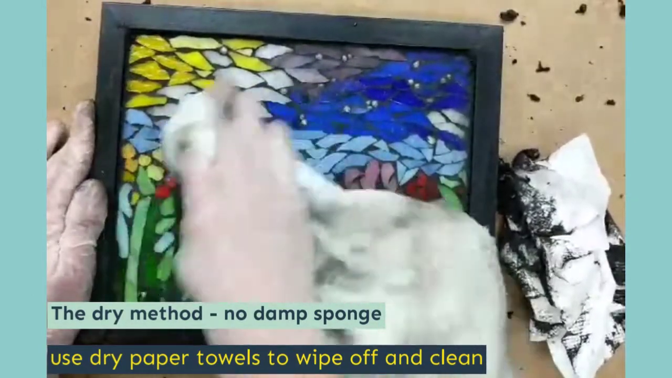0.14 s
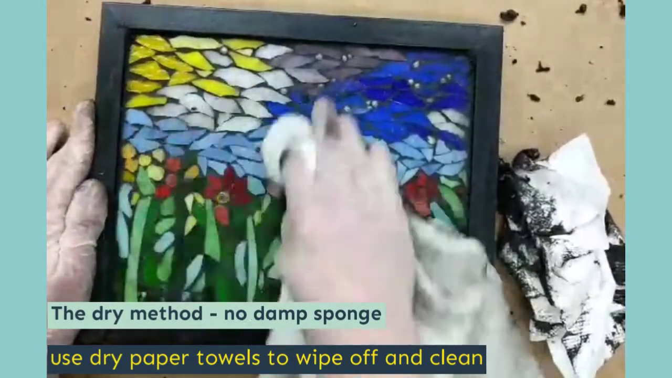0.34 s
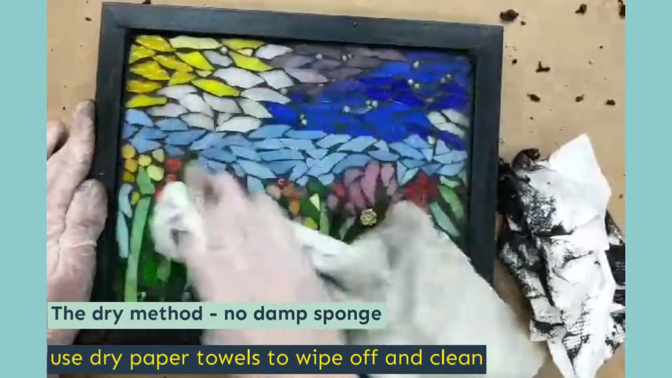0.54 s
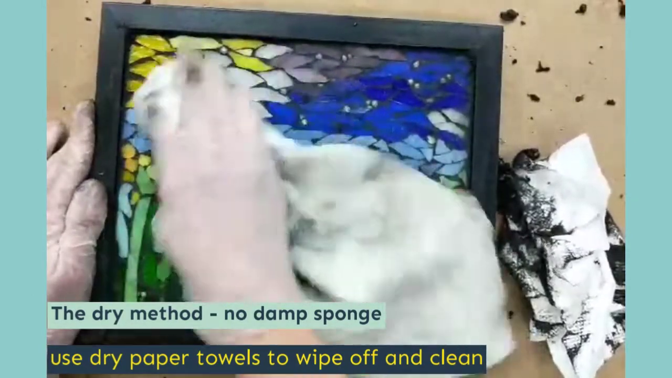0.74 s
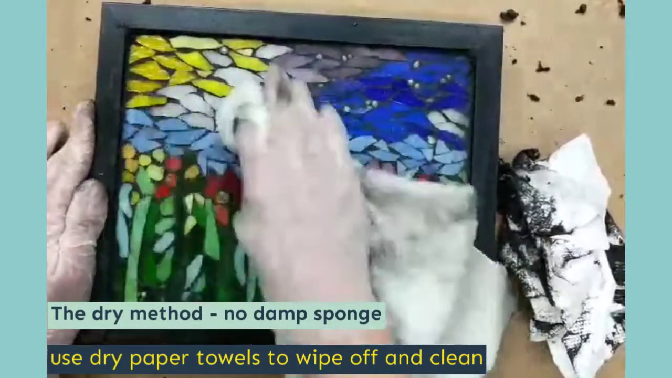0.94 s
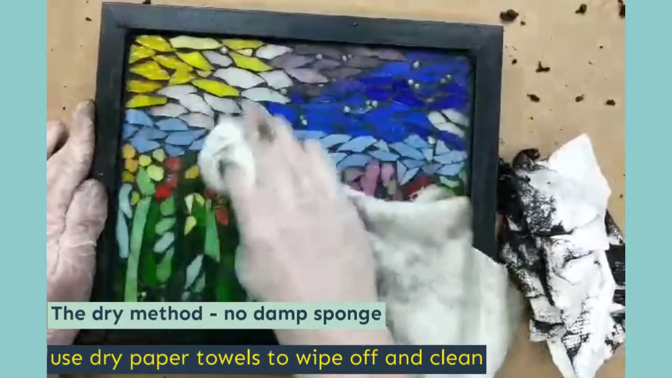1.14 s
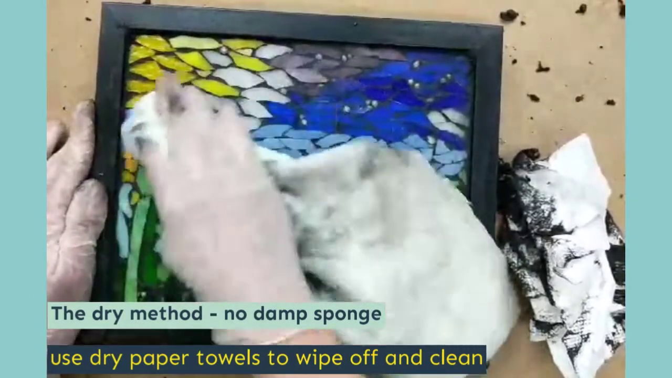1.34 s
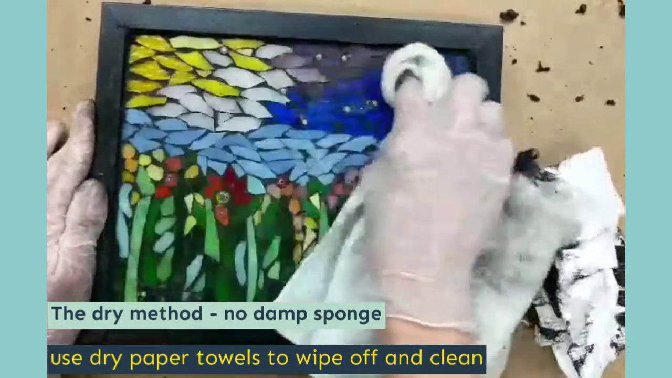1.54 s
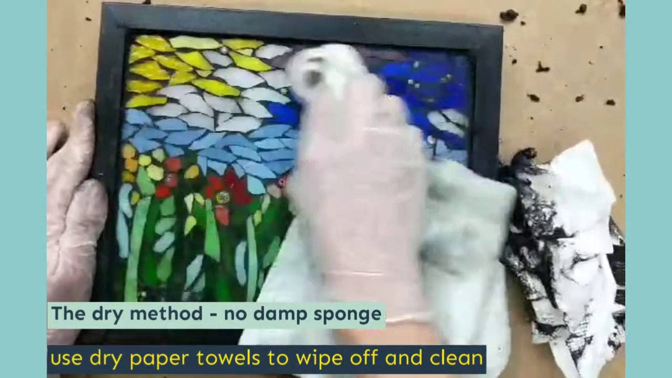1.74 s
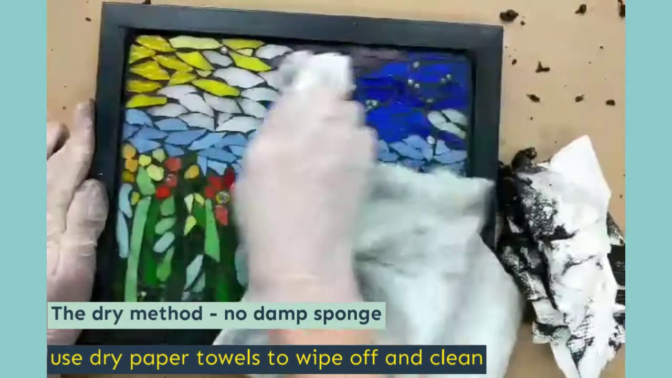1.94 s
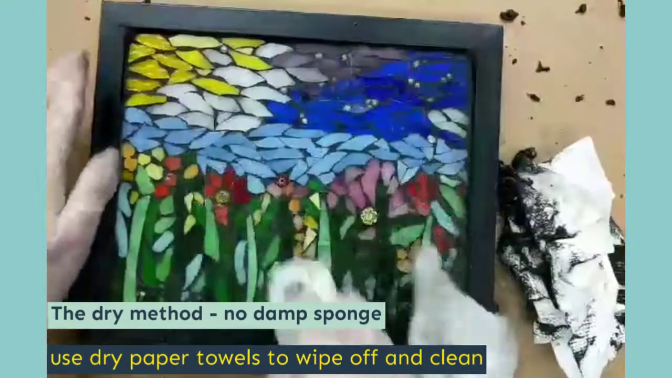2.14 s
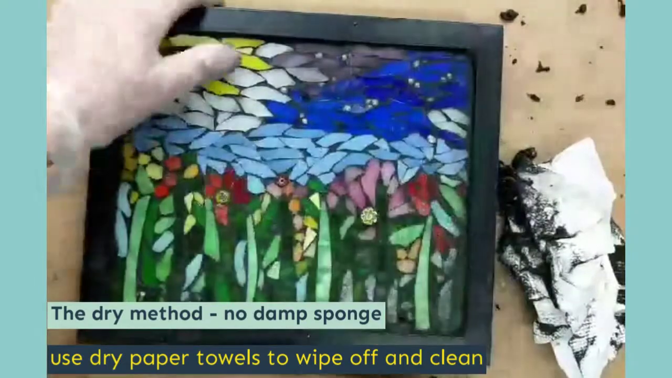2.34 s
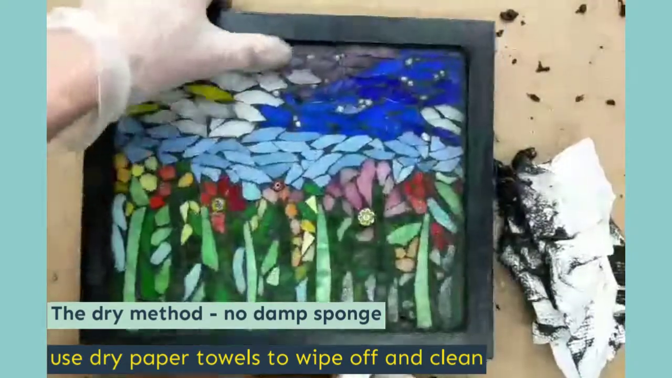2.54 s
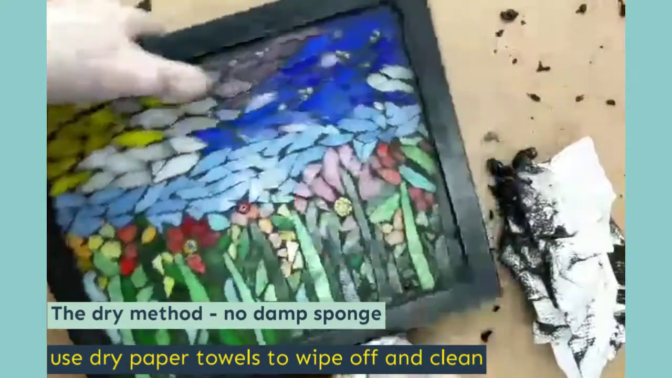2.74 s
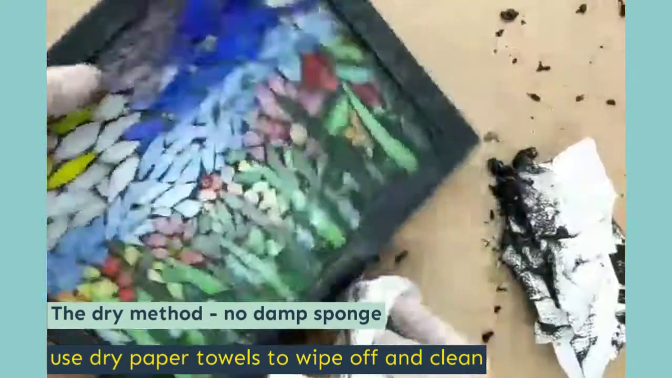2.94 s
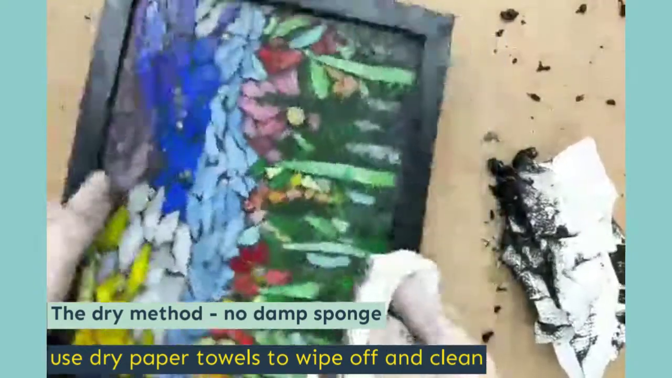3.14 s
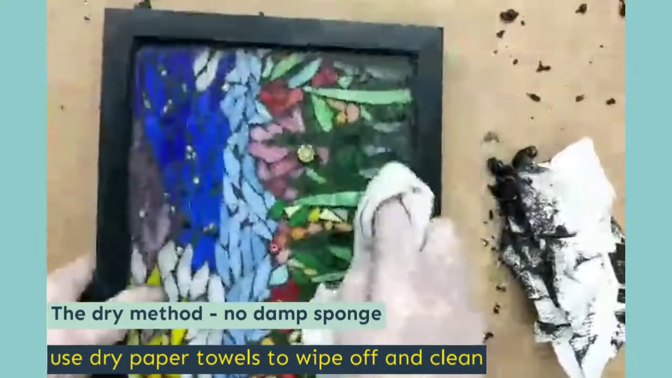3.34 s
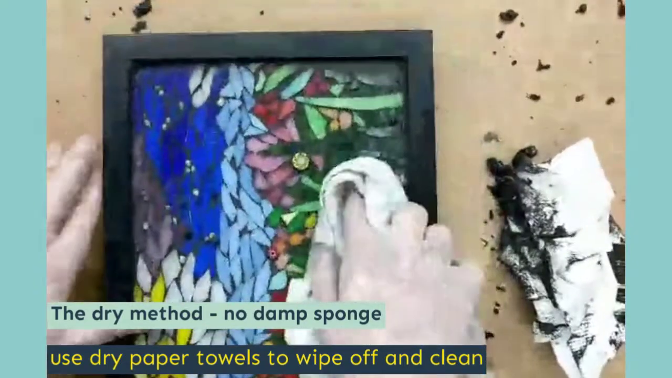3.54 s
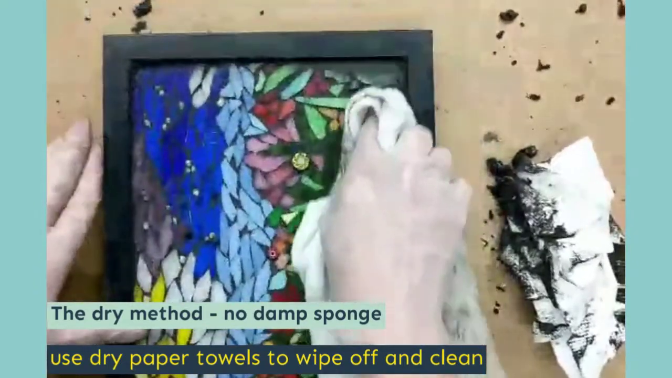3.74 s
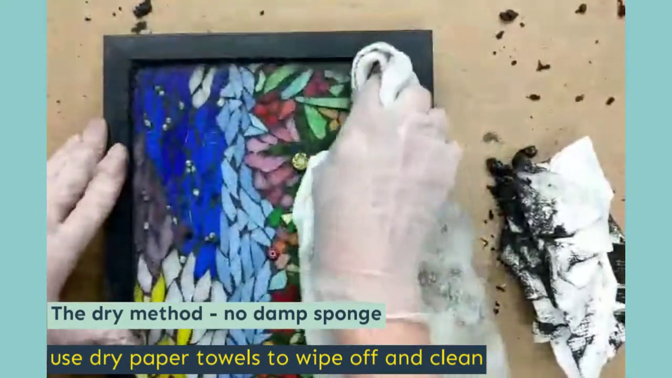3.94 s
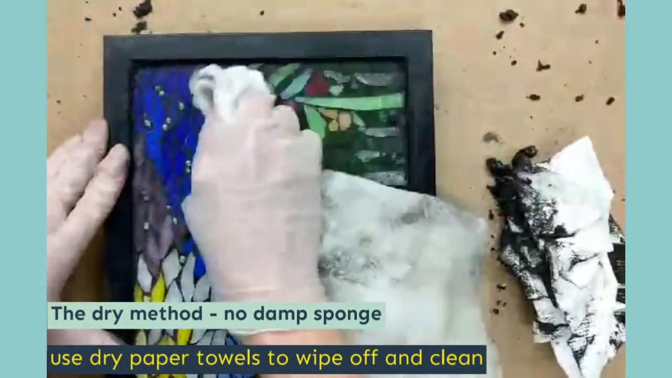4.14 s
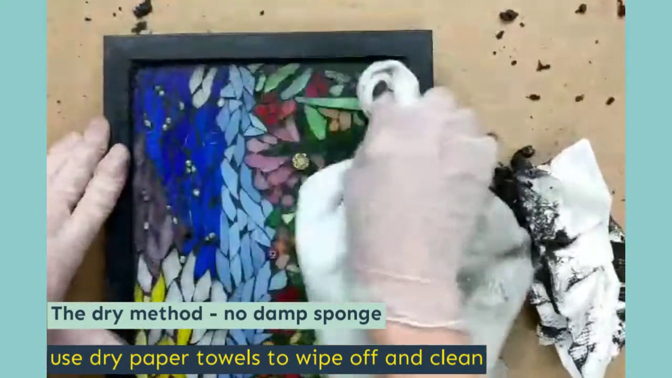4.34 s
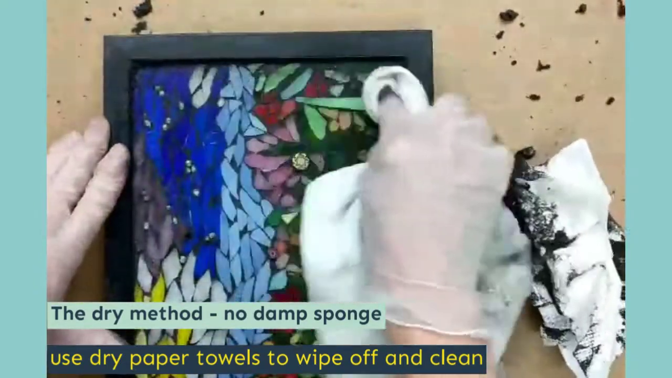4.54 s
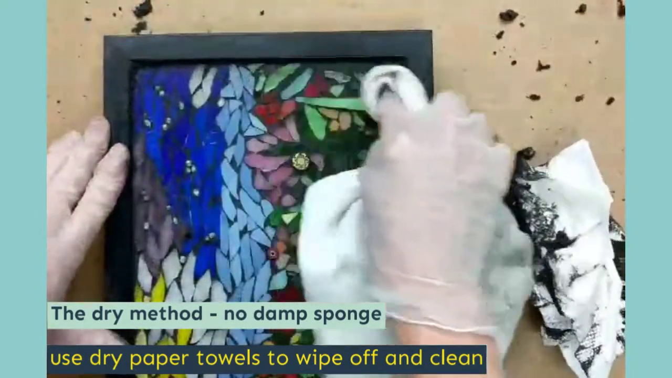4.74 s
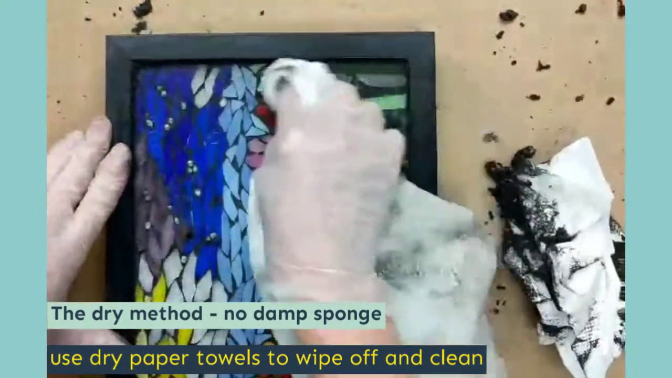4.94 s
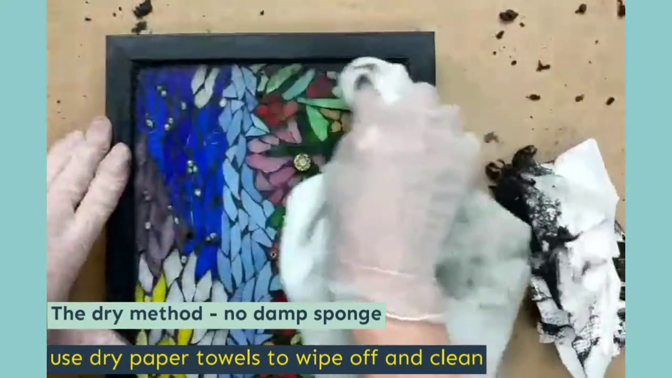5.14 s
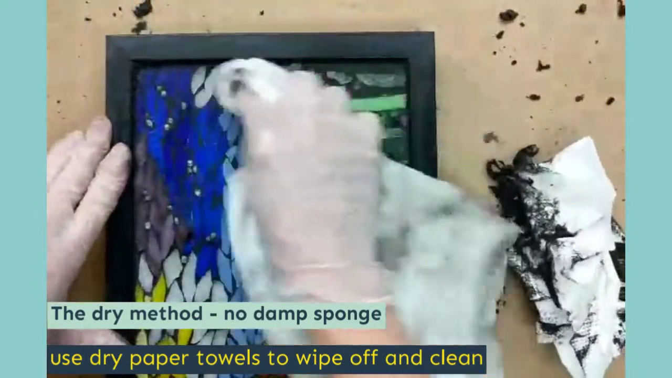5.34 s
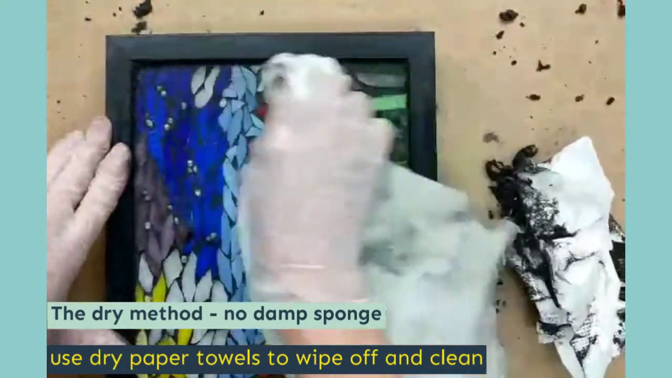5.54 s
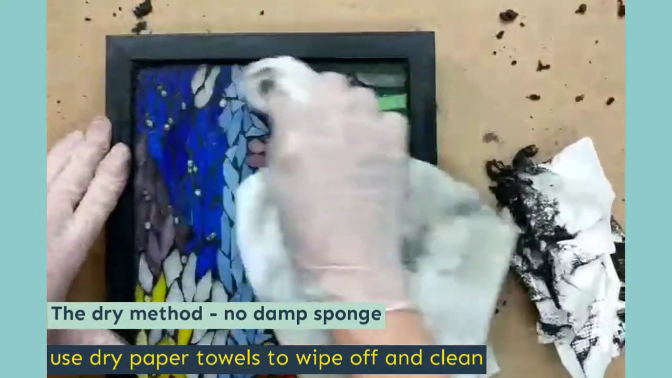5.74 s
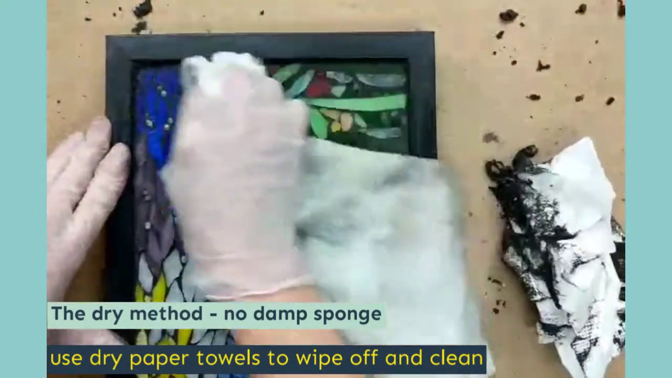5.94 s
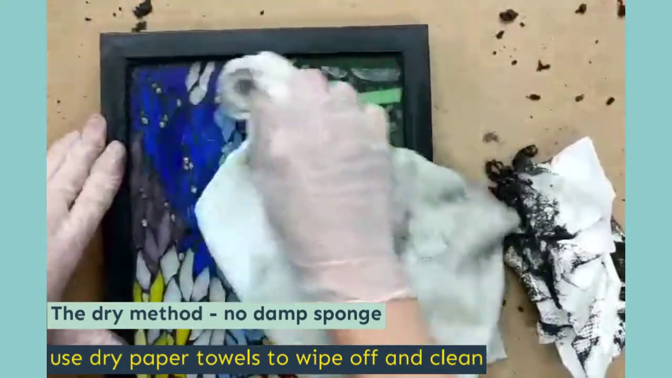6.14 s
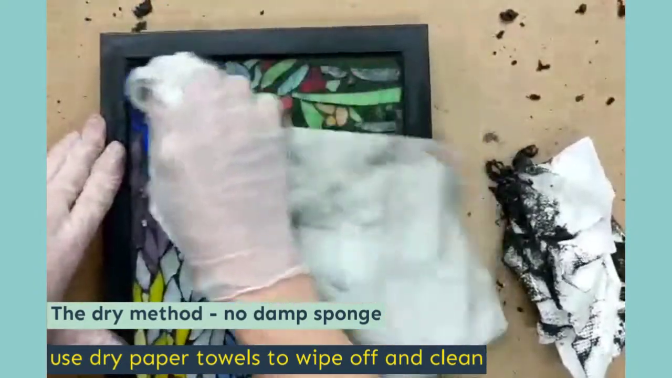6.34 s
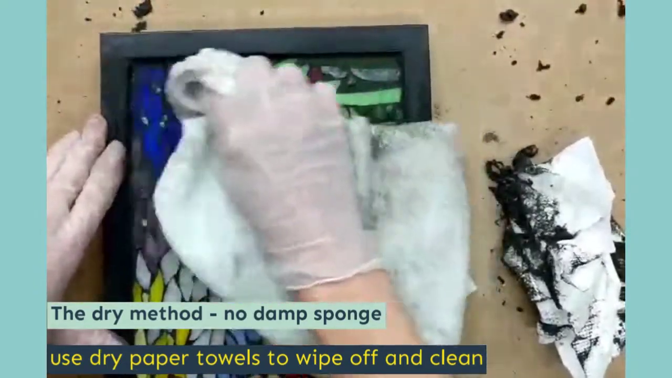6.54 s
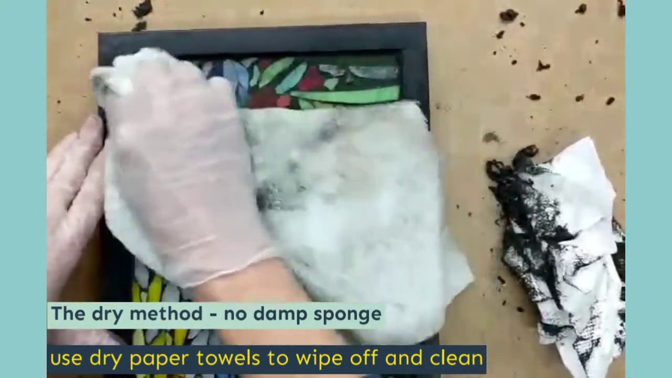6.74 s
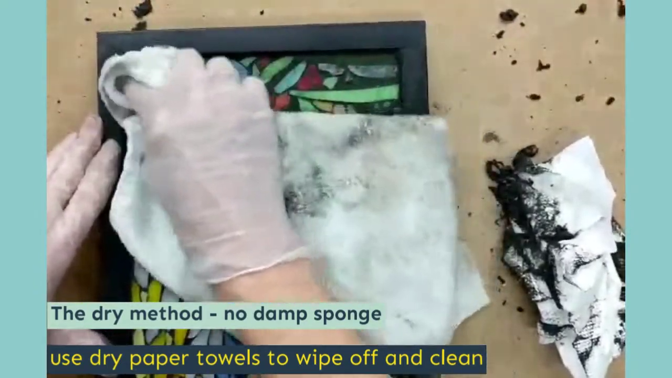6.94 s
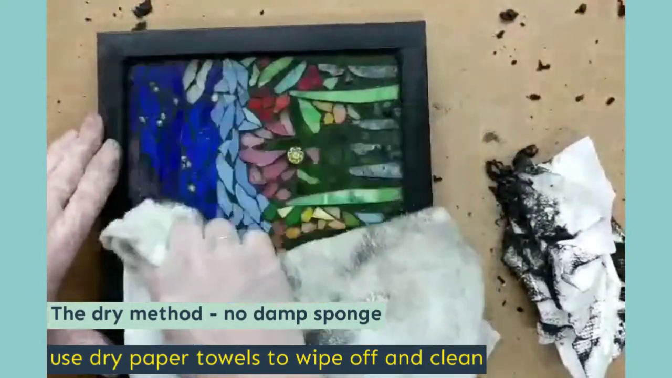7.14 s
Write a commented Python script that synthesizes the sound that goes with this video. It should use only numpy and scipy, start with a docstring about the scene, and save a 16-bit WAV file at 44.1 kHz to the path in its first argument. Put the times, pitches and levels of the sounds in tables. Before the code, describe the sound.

A dry paper towel rubs glass mosaic tiles in quick scratchy strokes, then the frame scrapes, squeaks and drops flat before rubbing resumes.

```python
"""A dry paper towel buffs a glass mosaic in a wooden frame, close to the microphone in a small, quiet room.
First come quick strokes: fibres hiss on the glass, the wad bumps over the grout and its folds snap.
Midway the frame is dragged round on the paper-covered table: it scrapes, drones, knocks and hisses faintly,
then squeaks and drops flat. The strokes return with a new balance. Hiss, scrape and bumps are filtered
random slips that follow the speed of each push; knocks are ringing modes; the squeaks are gliding sines."""
import sys
import numpy as np
from scipy import signal
from scipy.fft import rfft, irfft
from scipy.io import wavfile
from scipy.ndimage import map_coordinates

SR = 44100
rng = np.random.default_rng(int(sys.argv[2]) if len(sys.argv) > 2 else 0)


def output_pcm(signal):
    """Save a mono or channel-first signal as 16-bit PCM at the path in sys.argv[1].

    Samples are clipped to [-1, 1] before scaling.
    """
    pcm = np.clip(np.atleast_2d(signal).T, -1, 1) * 32767
    wavfile.write(sys.argv[1], SR, np.round(pcm).astype(np.int16))


N = 321048  # length in samples

# Levels in the tables come before the trims that each function adds.
# Towel strokes, one per sweep of the hand. Each row: start in seconds, length in seconds, fastest moment
# as a share of the length, rubbing level in dB, sheen of the fibres in dB, bumping over the grout in dB.
STROKES = [(-0.04, 0.13, .6, -48, -53.5, -55), (0.06, .11, 0.35, -47.5, -55, -49),
           (0.17, 0.17, 0.43, -44, -54, -55), (0.30, .19, 0.25, -47.5, -57, -49.5),
           (0.48, 0.31, 0.12, -48.5, -56.5, -54), (0.66, 0.15, 0.41, -48.5, -59.5, -52.5),
           (0.78, .14, 0.5, -47, -54, -55.5), (0.91, 0.084, 0.47, -51, -62, -54),
           (0.97, 0.12, 0.38, -50, -62, -52.5), (1.08, 0.12, 0.31, -48.5, -56, -57),
           (1.20, .11, .5, -48.5, -71, -49.5), (1.31, 0.097, 0.65, -48, -52, -56.5),
           (1.44, .17, 0.28, -48, -51.5, -52.5), (1.65, .10, 0.45, -46.5, -53, -50.5),
           (1.78, .12, 0.58, -47, -54, -58.5), (1.94, 0.1, 0.79, -42, -52, -50.5),
           (2.02, 0.25, 0.084, -49.5, -61.5, -55.5), (2.30, 0.082, 0.65, -52, -53.5, -65),
           (2.41, 0.46, 0.17, -52, -54, -57.5), (3.55, 0.18, 0.23, -59.5, -58, -55),
           (3.71, 0.24, 0.39, -57, -55.5, -61.5), (3.96, 0.2, 0.78, -58.5, -55.5, -56.5),
           (4.06, 0.18, .6, -46, -49.5, -57), (4.255, 0.11, 0.69, -53, -48, -46),
           (4.445, 0.062, 0.69, -59.5, -50.5, -56.5), (4.555, 0.065, 0.5, -59, -52, -55),
           (4.67, 0.051, 0.9, -65, -57.5, -74), (4.79, 0.11, 0.58, -64, -56.5, -73.5),
           (4.83, 0.035, 0.93, -49, -50, -54), (4.94, 0.074, 0.7, -54, -49, -50),
           (5.08, 0.077, 0.64, -59, -49, -54.5), (5.21, 0.12, 0.63, -52.5, -49.5, -48),
           (5.39, 0.14, 0.58, -51.5, -50.5, -53), (5.57, 0.14, 0.54, -48.5, -49.5, -55),
           (5.755, .14, 0.44, -50.5, -51, -49), (5.93, 0.14, 0.47, -52, -53, -48.5),
           (6.055, 0.06, 0.32, -39, -43.5, -43), (6.10, 0.16, 1, -52.5, -57.5, -64),
           (6.32, .17, 0.48, -52, -53, -55.5), (6.53, 0.14, 0.57, -53.5, -55, -56),
           (6.715, 0.13, 0.87, -49.5, -50.5, -48.5), (6.84, 0.11, 0.45, -57, -63, -65),
           (7.035, 0.19, 0.65, -49.5, -51.5, -54.5), (7.24, 0.11, 0.58, -58, -60, -54)]
# Snaps of paper folds and grit. Each row: moment in seconds, level in dB, treble in dB, pitch in Hz.
FOLD_SNAPS = [(0.275, -38, -33, 1180), (0.385, -29.5, -18, 2590), (1.698, -27.5, -36, 4060),
              (1.838, -41, -43, 1930), (1.934, -37, -18, 6550), (1.999, -31.5, -35, 2090),
              (2.019, -28.5, -28, 2490), (2.317, -35.5, 11, 11400), (2.505, -26, -19, 2080),
              (2.539, -30, -27, 2090), (2.588, -27.5, -19, 1720), (2.614, -22.5, -21, 1790),
              (2.685, -22.5, -7, 2210), (2.812, -16, -23, 4280), (2.839, -21.5, -13, 1980),
              (2.849, -19, -22, 1820), (2.927, -25, -23, 1465), (3.254, -26, -13.5, 1760),
              (3.831, -30, -8, 7700), (4.839, -34, -7, 2498), (4.856, -27.5, -19, 2900),
              (6.007, -28.5, -27, 2200), (6.037, -33, -26, 2530), (6.072, -19.5, -24.5, 2140),
              (6.091, -22, -12, 2260), (6.21, -35.5, -19, 1870), (6.487, -34, -19.5, 1794),
              (6.796, -33, -21.5, 2400), (6.81, -25, -33.5, 1910), (7.025, -43.5, -30, 2320),
              (7.054, -37, -33, 1290), (7.145, -29.5, -28, 3220)]
# Knocks and bumps of the frame. Each row: start in seconds, peak of the frame's ring in dB,
# peak of the table's thump in dB, hardness of the contact in Hz.
FRAME_KNOCKS = [(0.705, -43, -42.5, 180), (0.922, -42.5, -53, 400), (1.486, -34, -34.5, 130),
                (1.690, -61, -44, 200), (2.016, -59, -51, 300), (2.431, -36, -40.5, 1800),
                (2.504, -35, -33.5, 1210), (2.596, -38, -31.5, 1500), (2.726, -22, -59, 2940),
                (2.757, -21, -52, 3000), (2.775, -27, -48, 4000), (2.7786, -9.5, -33, 3500),
                (2.841, -22, -28.5, 2008), (2.91, -32.5, -48, 4000), (3.252, -25, -31.5, 2970),
                (3.314, -28, -28.5, 2020), (3.318, -16, -26, 649), (3.346, -54, -36, 59.8),
                (3.364, -35, -44.5, 4000), (3.477, -22.5, -17, 5000), (3.4784, -12.5, -3.5, 852),
                (4.340, -47, -37, 350), (4.852, -43, -41.5, 1500), (5.437, -39.5, -43, 503),
                (6.091, -36, -28.5, 1200), (6.805, -41, -49, 1500)]
# Modes of the framed mosaic. Each row: frequency in Hz, relative level in dB, 60 dB decay in seconds.
FRAME_MODES = [(228, -8.5, 0.097), (466, -6, 0.026), (552, 1, 0.059), (613, 0.5, .07), (1074, -7, .04),
               (1060, -18, 0.053), (1516, -6, 0.022), (1680, -10.5, 0.025), (1880, 15.5, 0.01),
               (2090, 4.5, 0.02), (2190, -13.5, 0.037), (2340, -6.5, 0.041), (3260, -9.5, 0.031),
               (4050, -26, .025), (4360, -11.5, .02)]
# Modes of the table top. Each row: frequency in Hz, relative level in dB, 60 dB decay in seconds.
TABLE_MODES = [(117, -21.5, 0.16), (174.9, -17, .25), (205.2, -19.5, 0.27), (370.5, 8, 0.042),
               (450, -2.5, 0.024), (500, -22.5, 0.046), (594, -9, 0.039), (660, -14, 0.096),
               (873, -6.5, 0.04), (998, -10.5, 0.077), (1140, -16, 0.1), (1450, -26.5, .07)]
# Spectrum of the wad rubbing. Each row: frequency in Hz, relative level in dB.
RUB_SPECTRUM = [(150, 5.5), (500, 1.5), (800, -1.5), (1150, 1.5), (2100, -0.5), (2700, 1), (3300, -4.5),
                (5000, -6.5), (8000, -22), (14000, -48)]
# Spectrum of the fibres' bright sheen. Each row: frequency in Hz, relative level in dB.
SHEEN_SPECTRUM = [(1500, -6), (3500, 1), (5000, 1), (7200, 1), (9500, -2.5), (12000, -9), (14000, -14)]
# Spectrum of the panel bumped over the grout. Each row: frequency in Hz, relative level in dB.
BUMP_SPECTRUM = [(30, -55), (50, -45), (70, -32), (95, -6), (150, -6), (235, 2.5), (280, -1), (370, 1),
                 (520, -11.5), (800, -18), (1500, -28.5)]
# The same bumping once the frame is turned. Each row: frequency in Hz, relative level in dB.
TURNED_BUMP_SPECTRUM = [(30, -52), (50, -42), (70, -8), (100, -3.5), (150, -2.5), (220, -1.5), (370, -0.5),
                        (480, -2), (620, -8.5), (800, -15.5), (1500, -30)]
# Spectrum of grit and small creases. Each row: frequency in Hz, relative level in dB.
GRIT_SPECTRUM = [(500, -31.5), (2000, 2), (4000, -11.5), (7000, -10.5), (11000, 2.5), (14000, -3)]
# Spectrum of the wood's drone. Each row: frequency in Hz, relative level in dB.
DRONE_SPECTRUM = [(40, -38.5), (80, -23), (115, 0), (160, -12), (237, 2.5), (310, -5), (430, -6.5),
                  (530, 6), (630, 6), (740, -19.5), (1500, -32.5)]
# Spectrum of the frame scraping on paper. Each row: frequency in Hz, relative level in dB.
SCRAPE_SPECTRUM = [(200, -16), (520, -7.5), (800, -13.5), (1200, -6), (1480, -12.5), (1650, -4), (1900, -3),
                   (2400, -8.5), (3100, -7.5), (4400, -12), (8000, -21), (14000, -38)]
# Spectrum of a snap before its own pitch and treble. Each row: frequency in Hz, relative level in dB.
SNAP_SPECTRUM = [(100, -30), (400, 1), (900, -13.5), (2000, -3.5), (3300, -3.5), (5000, -4), (9000, -1),
                 (14000, -2.5)]
# Spectrum of the quiet air. Each row: frequency in Hz, relative level in dB.
AIR_SPECTRUM = [(24, -48), (45, -29), (100, 2), (200, -5), (380, -14), (800, -9.5), (2000, -14.5),
                (6000, -29.5), (14000, -19)]
# Decay of the room's tail. Each row: frequency in Hz, 60 dB decay in seconds.
ROOM_DECAY = [(100, 0.54), (370, 0.5), (1000, 0.21), (3000, 0.73), (12000, 0.38)]
# The hollow of the wad under the palm, changing slowly with the grip. Each row: time in seconds, resonance in Hz.
PALM_HOLLOW = [(0.0, 1390), (1.25, 1500), (1.66, 2150), (4.2, 1679), (4.8, 2402), (5.7, 1980), (7.28, 1998)]
# Shoves of the frame over the table. Each row: start in seconds, length in seconds, fastest moment as a
# share of the length, scraping level in dB, grit in dB, drone of the wood in dB.
SHOVES = [(2.585, 0.11, 0.2, -38, -45.5, -46.5), (2.66, 0.19, 0.48, -37.5, -39.5, -33.5),
          (2.81, 0.062, .65, -44, -48, -30.5), (2.87, 0.093, 0.69, -50, -54.5, -54.5),
          (2.92, 0.96, 0.13, -64.5, -70.5, -66.5), (3.26, 0.16, 0.35, -49.5, -53, -44.5),
          (3.398, 0.086, .35, -36, -44, -46)]
# The frame's edge squeaking on the table. Each row: start in seconds, length in seconds, first pitch in Hz,
# last pitch in Hz, level in dB.
EDGE_SQUEAKS = [(3.424, 0.018, 2150, 1850, -34), (3.449, .021, 1950, 1380, -24)]

# Each sound grows as this power of the speed of the hand or the frame
RUB_LAW, SHEEN_LAW, BUMP_LAW = 1.18, 0.95, 1.72
SCRAPE_LAW, GRIT_LAW, DRONE_LAW = 0.62, 0.61, 2.2
TURN_S = 0.011  # the wad keeps rolling this long before and after each sweep
BUMP_LAG_S = 0.013  # the panel's rumble trails the hiss
# The wad pressed on the tiles: rubbing, sheen and bumping in dB
RESTING_DB = (-66.5, -68, -69)
LIFT_S, RETURN_S = 2.58, 3.55  # that resting bed is silent between these times
SWING_START_S, SWING_LENGTH_S = 2.95, 0.31
SWING_FROM_HZ, SWING_TO_HZ, SWING_DB = 700, 845, -66
EDGE_HZ = 14150  # top of the final band


def amp(db):
    """Decibels to gain."""
    return 10 ** (np.asarray(db) / 20)


def evened(x):
    """Scales to rms 1."""
    return x / np.sqrt(np.mean(x ** 2) + 1e-20)


def read(points, hz):
    """Reads a curve of values on a log-frequency axis."""
    f, value = np.transpose(points)
    return np.interp(np.log(hz + 1), np.log(f), value)


def add(mix, s, sound):
    """Mixes a sound in at time s."""
    part = mix[max(round(s * SR), 0):][:len(sound)]
    part += sound[:len(part)]


def colour(x, points):
    """Shapes x with a spectrum, at rms 1."""
    gain = amp(read(points, np.fft.rfftfreq(len(x), 1 / SR)))
    return evened(irfft(rfft(x) * gain, len(x)))


def wander(per_s):
    """Smooth random curve of rms 1 that changes about per_s times a second."""
    hz = np.fft.rfftfreq(N, 1 / SR)
    smooth = rfft(rng.standard_normal(N)) / (1 + (hz / per_s) ** 2)
    return evened(irfft(smooth, N))


def slips(per_s, spread_db):
    """A random train of tiny slips: many small, a few large."""
    rise_db = spread_db * np.minimum(rng.exponential(1, N), 4.5)
    size = amp(rise_db) * rng.choice([-1, 1], N)
    return size * (rng.random(N) < per_s / SR)


def resonate(x, hz, width_hz):
    """A resonance of gain 1 that follows the curve hz: shift down, smooth, shift back up."""
    turn = np.exp(2j * np.pi * np.cumsum(hz) / SR)
    r = np.exp(-np.pi * width_hz / SR)
    smooth = signal.lfilter([1 - r], [1, -r], x / turn)
    return 2 * (turn * smooth).real


def mottle(x, patchy_db, patch_s=0.035, octaves=0.5193, size=512):
    """Surface texture as random louder and softer patches in time and pitch, at rms 1."""
    hz, t, z = signal.stft(x, SR, nperseg=size)
    place = np.meshgrid(np.log2(1 + hz / 100) / octaves, t / patch_s, indexing="ij")
    patches = map_coordinates(rng.standard_normal((size, size)), place, order=1, mode="wrap")
    mottled = signal.istft(z * amp(patchy_db * patches), SR, nperseg=size)[1]
    return evened(mottled[:N])


def sweeps(rows, laws, spill_s):
    """Each push speeds up and slows to a stop; returns three gains, each its own power of that speed."""
    t, power = np.arange(N) / SR, np.zeros((3, N))
    for start, length, fastest, *levels in rows:
        begin, end = start - spill_s, start + length + spill_s
        peak = start + length * np.clip(fastest, 0.05, 0.95)
        span = slice(*np.searchsorted(t, [begin, end]))
        progress = np.interp(t[span], [begin, peak, end], [0, 0.5, 1])
        speed = abs(np.sin(np.pi * progress))
        power[:, span] += [(amp(db) * speed ** law) ** 2 for db, law in zip(levels, laws)]
    return np.sqrt(power)


def ring(modes, hardness_hz, size=13000):
    """Modes struck by one blow, peak 1; neighbours in the list swing opposite ways, a soft contact mutes the highs."""
    t, free = np.arange(size) / SR, np.zeros(size)
    for k, (hz, db, t60) in enumerate(modes):
        free += (-1) ** k * amp(db - 60 * t / t60) * np.sin(2 * np.pi * hz * t)
    push = t * np.exp(-2 * np.pi * hardness_hz * t)
    blow = signal.fftconvolve(free, push)[:size]
    return blow / abs(blow).max()


def air(level_db=-68):
    """The quiet air of the room: steady coloured noise."""
    return amp(level_db) * colour(rng.standard_normal(N), AIR_SPECTRUM)


def room(x, early_db=-13, early_s=0.07, tail_db=-24, size=26000):
    """Quick reflections from the table and nearby things, then a faint tail that dies by band."""
    t = np.arange(size) / SR
    signs = rng.choice([-1., 1.], (2, size))
    near, far = signs * (rng.random((2, size)) < 3000 / SR) * (t > 0.003)  # sparse echoes, 3000 a second
    near = near * amp(-60 * t / early_s)
    hz, age, z = signal.stft(far, SR, nperseg=256)
    dull_db = read([(600, -1), (2000, -10.0), (8000, -6.5)], hz)  # the walls return less treble
    decay_db = -60 * age / read(ROOM_DECAY, hz)[:, None]
    tail = signal.istft(z * amp(dull_db[:, None] + decay_db), SR, nperseg=256)[1][:size]
    echo = amp(early_db) * near / np.linalg.norm(near) + amp(tail_db) * tail / np.linalg.norm(tail)
    return x + signal.fftconvolve(x, echo)[:N]


def swing(width_hz=220, upper_ratio=1.65, upper_db=-3):
    """The frame swings round on the paper: a faint hollow hiss of two rising resonances, excited by slips."""
    u = np.clip((np.arange(N) / SR - SWING_START_S) / SWING_LENGTH_S, 0, 1)
    hz = SWING_FROM_HZ + (SWING_TO_HZ - SWING_FROM_HZ) * u
    drag = slips(per_s=5600, spread_db=0.0)
    # each resonance is applied twice for steeper sides
    low, high = (evened(resonate(resonate(drag, f, width_hz), f, width_hz)) for f in (hz, hz * upper_ratio))
    swell = np.sqrt(abs(np.sin(np.pi * u)))
    return amp(SWING_DB) * swell * (low + amp(upper_db) * high)


def squeak(waver=0.072, rough_db=4.5):
    """The frame's edge sticks and slips just before it drops: short, rough chirps that swell and fall in pitch."""
    t, out = np.arange(N) / SR, np.zeros(N)
    unsteady = 1 + waver * wander(per_s=91)
    rough = amp(rough_db * wander(per_s=630))
    for start, length, first_hz, last_hz, db in EDGE_SQUEAKS:
        u = np.clip((t - start) / length, 0, 1)
        pitch_hz = (first_hz + (last_hz - first_hz) * u) * unsteady
        turns = np.cumsum(pitch_hz) / SR
        out += amp(db) * np.sin(np.pi * u) * np.sin(2 * np.pi * turns)
    return out * rough


def slide(judder_db=1.0, wood_db=-13.5, paper_db=0.5, grit_db=0.5, drone_db=-1.0):
    """The frame judders over gritty paper; its slips make the wood ring and drone."""
    speed, fizz, weight = sweeps(SHOVES, (SCRAPE_LAW, GRIT_LAW, DRONE_LAW), spill_s=0.004)
    judder = amp(judder_db * wander(per_s=99))
    grit = slips(per_s=4500, spread_db=5.0) * judder
    drag = slips(per_s=3500, spread_db=1.5) * judder
    wood = evened(signal.fftconvolve(drag, ring(FRAME_MODES, hardness_hz=6000))[:N])
    paper = mottle(colour(drag, SCRAPE_SPECTRUM), patchy_db=4.5, patch_s=0.016)
    scrape = speed * (amp(wood_db) * wood + amp(paper_db) * paper)
    crackle = amp(grit_db) * fizz * mottle(colour(grit, GRIT_SPECTRUM), patchy_db=5.0, patch_s=0.0081)
    drone = amp(drone_db) * weight * colour(drag, DRONE_SPECTRUM)
    return scrape + crackle + drone


def knocks(tick_db=-10, tick_s=0.0052, rattle_db=-22, rattle_s=0.2, rise_s=0.00094, size=6000):
    """The frame hits the table: a tick and a short rattle at the contact, while both objects ring."""
    out, t = np.zeros(N), np.arange(size) / SR
    tick_fade = amp(tick_db - 60 * np.maximum(t - rise_s, 0) / tick_s)
    rattle_fade = amp(rattle_db - 60 * t / rattle_s)
    fade = np.minimum(t / rise_s, 1) * (tick_fade + rattle_fade)
    for s, frame_db, table_db, hard_hz in FRAME_KNOCKS:
        r = np.exp(-2 * np.pi * hard_hz / SR)
        # a broad band of noise, higher for a hard contact
        contact = evened(signal.lfilter([1, 0, -1], np.poly([r, r, r]), rng.standard_normal(size)))
        add(out, s, amp(frame_db) * contact * fade)
        add(out, s, amp(frame_db) * ring(FRAME_MODES, hard_hz))
        add(out, s, amp(table_db) * ring(TABLE_MODES, hard_hz))
    return out


def snaps(rise_s=0.0018, fall_s=0.013, linger_db=-22, linger_s=0.024, level_db=-4,
          pitch_db=7, octaves=0.12, usual_db=-14, size=4096):
    """A fold or grain gives way and lets go: a crack with a pitch of its own, and a brief rustle after it."""
    out, t, hz = np.zeros(N), np.arange(size) / SR, np.fft.rfftfreq(size, 1 / SR)
    treble = np.interp(hz, [2500, 7000], [0, 1])
    age = np.maximum(t - rise_s, 0)
    fall = amp(-60 * age / fall_s) + amp(linger_db - 60 * age / linger_s)
    fade = np.minimum(t / rise_s, 1) ** 2 * fall
    for s, db, bright_db, pitch_hz in FOLD_SNAPS:
        hump_db = pitch_db * np.exp(-(np.log2((hz + 1) / pitch_hz) / octaves) ** 2)
        tilt_db = treble * (bright_db - usual_db)  # treble against the usual amount
        gain = amp(read(SNAP_SPECTRUM, hz) + hump_db + tilt_db)
        crack = irfft(rfft(rng.standard_normal(size)) * gain)
        add(out, s - rise_s / 2, amp(db + level_db) * evened(crack) * fade)
    return out


def towel(catch_db=2.0, bump_db=3.0, rub_db=-6.0, hollow_db=1.5, crinkle_db=-15):
    """Fibres slip on the glass and catch on tile edges, while the wad bumps the panel over the grout."""
    t = np.arange(N) / SR
    turned = t > RETURN_S
    resting = amp(RESTING_DB)[:, None] * ((t < LIFT_S) | turned)
    strokes = sweeps(STROKES, (RUB_LAW, SHEEN_LAW, BUMP_LAW), TURN_S)
    speed, sheen, pressure = np.hypot(strokes, resting)
    pressure = np.interp(t - BUMP_LAG_S, t, pressure)

    friction = colour(slips(per_s=5400, spread_db=3.0), RUB_SPECTRUM)
    rub = amp(rub_db) * speed * mottle(friction, patchy_db=3.5)
    hollow_hz = np.interp(t, *np.transpose(PALM_HOLLOW))
    rub = rub + amp(hollow_db) * resonate(rub, hollow_hz, width_hz=1120)

    hiss = colour(slips(per_s=12000, spread_db=3.0), SHEEN_SPECTRUM)
    fibres = sheen * mottle(hiss, patchy_db=3.5)

    jolts = slips(per_s=1400, spread_db=2.0)
    # once turned, the panel sits differently
    panel = np.where(turned, colour(jolts, TURNED_BUMP_SPECTRUM), colour(jolts, BUMP_SPECTRUM))
    bumps = pressure * mottle(panel, patchy_db=0.5)

    creases = slips(per_s=130, spread_db=3.0)  # small creases giving way
    crinkle = amp(crinkle_db) * sheen * colour(creases, GRIT_SPECTRUM)

    catching = evened(amp(catch_db * wander(per_s=59)))
    bumping = evened(amp(bump_db * wander(per_s=14)))
    return crinkle + (rub + fibres) * catching + bumps * bumping


def scene():
    """All the handling sounds in the room, over its quiet air, as one channel."""
    handling = swing() + squeak() + slide() + knocks() + snaps() + towel()
    return (air() + room(handling))[None]


def record(dry, low_cut_hz=80):
    """A small microphone without deep bass, then a steep cut above the band's top."""
    thin = signal.sosfilt(signal.butter(6, low_cut_hz, "high", fs=SR, output="sos"), dry)
    low_pass = signal.firwin(501, EDGE_HZ, window=("kaiser", 9), fs=SR)
    return signal.oaconvolve(thin, low_pass[None], "same")


dry = scene()
out = record(dry)
output_pcm(out)
```